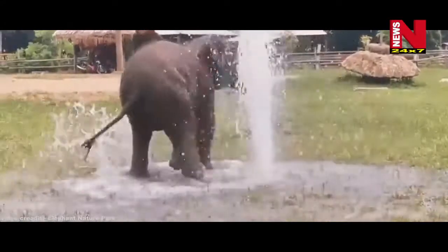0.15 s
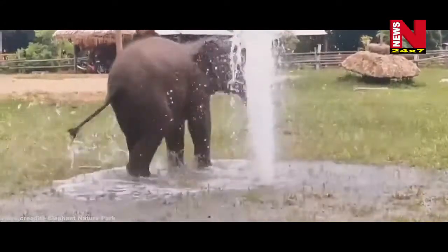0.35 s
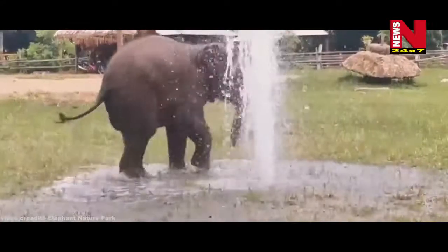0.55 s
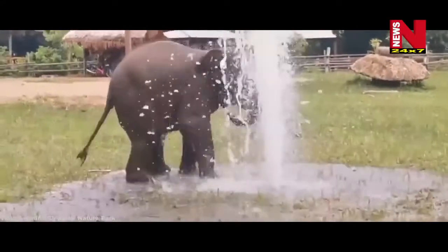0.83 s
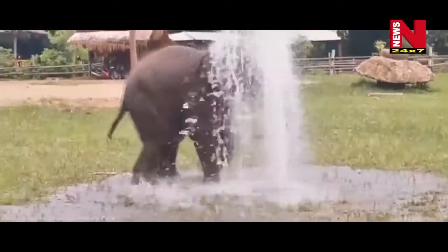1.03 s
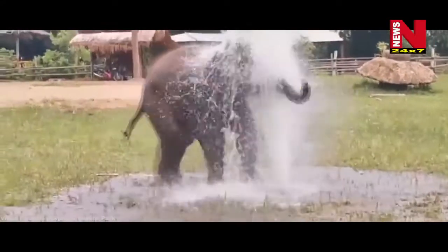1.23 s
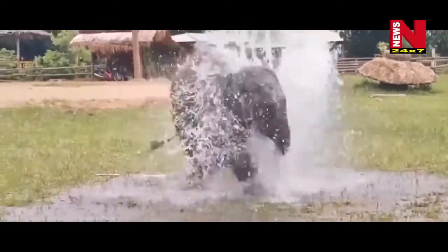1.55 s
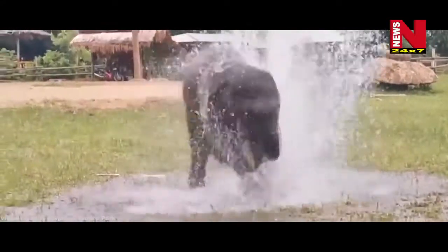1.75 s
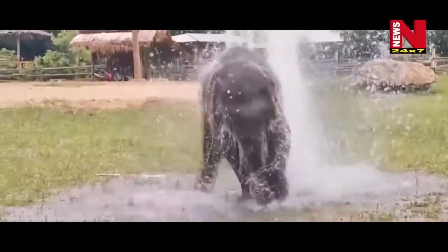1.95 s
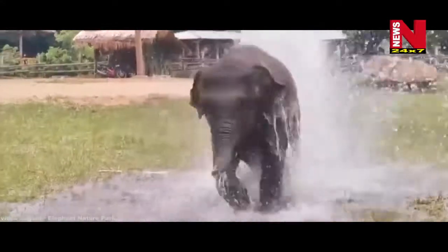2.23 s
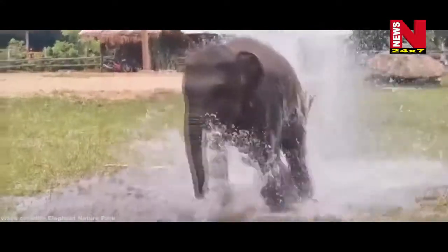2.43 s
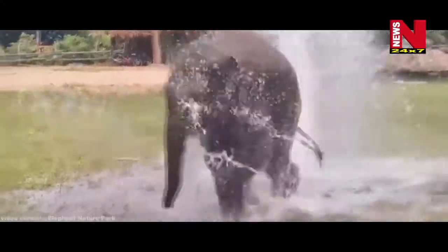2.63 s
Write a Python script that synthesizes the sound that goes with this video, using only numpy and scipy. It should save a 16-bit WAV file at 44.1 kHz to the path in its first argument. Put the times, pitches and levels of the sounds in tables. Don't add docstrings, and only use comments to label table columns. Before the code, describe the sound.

Bright gushing spray from a broken pipe runs throughout, dipping near one second and surging after one and a half. Wet slaps and low gulping wading sounds follow, over faint hum, in coloured, slightly phasey mono.

```python
import sys
import numpy as np
from scipy import signal
from scipy.io import wavfile
from scipy.ndimage import uniform_filter1d

SR = 44100
rng = np.random.default_rng(int(sys.argv[2]) if len(sys.argv) > 2 else 0)


def waveform_to_disk(signal):
    frames = np.transpose(np.atleast_2d(signal))
    scaled = np.clip(frames, -1, 1) * 32767
    samples = np.round(scaled).astype(np.int16)
    wavfile.write(sys.argv[1], SR, samples)


def nominal_scale(level):
    x = np.asarray(level, float) / 20
    return 10 ** x


N = 123479

# time in seconds, level in dB, brightness in dB per octave.
SPRAY_CURVE = [(0, -32, 0), (.12, -34.5, -1.2), (.3, -33, 1.6), (.55, -35.5, -0.5), (.62, -34.5, 0.5),
               (.73, -33.5, 0.6), (.78, -37.5, -0.1), (1.0, -39, -0.54), (1.25, -37.5, -0.1),
               (1.42, -36, -0.3), (1.56, -30.5, 0), (1.66, -34, 1.5), (1.78, -29.5, 2), (1.95, -32.5, 0.2),
               (2.15, -31, 1.4), (2.3, -32.5, 1.5), (2.5, -34.5, -0.5), (2.8, -34, 2)]
# frequency in Hz, level in dB.
SPRAY_COLOUR = [(300, -20.5), (800, -6.5), (1500, -5), (2500, 4.5), (5000, 3), (7500, 3.5), (10000, 0),
                (14000, -8.5)]
# time in seconds, level in dB, tilt in dB per octave.
SPLATTER_CURVE = [(0, -40, -2.5), (.12, -38.5, -2), (.35, -37, -1.5), (.55, -53.5, 0.5), (.8, -48.5, -1.5),
                  (1.1, -55.5, -2), (1.38, -51, 1), (1.45, -36.5, -3.5), (1.6, -38.5, 0), (1.72, -35.5, 1),
                  (1.8, -35, 3.5), (1.9, -35, 0.5), (2.02, -28.5, -4), (2.12, -36, 0), (2.24, -38, 1.5),
                  (2.45, -32.5, -5), (2.65, -50, 0.5), (2.8, -35.5, -4)]
# time in seconds, level in dB.
SLOSH_CURVE = [(0.0, -36.5), (0.03, -47.5), (0.3, -45.5), (0.61, -55), (1.28, -59.5), (1.73, -46.5),
               (1.82, -40), (1.91, -41), (2.07, -39.5), (2.15, -50), (2.34, -40), (2.36, -46), (2.52, -38),
               (2.53, -39.5), (2.66, -42.5), (2.8, -40)]
# frequency in Hz, width in Hz, level in dB.
HUM_LINES = [
    (45, 20, -59),
    (90, 11, -56.5),
    (212, 8, -60),
]
# frequency in Hz, width in Hz, gain in dB.
HOUSING = [(483, 178, -6), (839, 314, 7), (1210, 105.5, -9), (1554, 325, 9.5), (1735, 64, -11),
           (2730, 108, -15), (3383, 122, -17), (3920, 240, -4.5), (6090, 220, 0.5), (6450, 230, -5),
           (7670, 870, -8), (9050, 1000, 1), (10310, 490, -1)]
# frequency in Hz, step size in dB.
GRAIN_STEP = [(0, -18), (600, -14), (1300, -3), (2600, 3.5), (8000, 3.5), (14000, 4.5)]

SPRAY_TRIM_DB, SPRAY_SURGE_DB, SPRAY_PATCH_DB, SPRAY_SURGE_HZ = 2, 0.5, 0.96, 15.5
DROPS_PER_S, DROP_SPREAD_DB, DROP_SHARE = 9000, 4, 0.32
GOUTS_PER_S, GOUT_SPREAD_DB, GOUT_CYCLES, GOUT_CLUMP_DB, GOUT_CLUMP_HZ = 1400, 3.8, 8.0, 3.0, 30
GOUT_LOW_HZ, GOUT_HIGH_HZ, GOUT_TRIM_DB, GOUT_WASH = 640, 2430, -1.5, 0.64
SLOSH_PER_S, SLOSH_CYCLES, SLOSH_LOW_HZ, SLOSH_HIGH_HZ = 400, 1.97, 184, 454
SLOSH_TRIM_DB, SLOSH_CLUMP_DB = 2, 3.0
RUMBLE_DB, RUMBLE_LOW_HZ, RUMBLE_HIGH_HZ = -54, 16, 128.7
FAN_START_S, FAN_SWELL_S, FAN_STOP_S, FAN_FALL_S = 0.57, 0.07, 0.74, 0.027
FAN_DB, FAN_LOW_HZ, FAN_HIGH_HZ = -38, 4430, 6870
SWAY_HZ, SWAY_SHIFT, SWAY_DEPTH = 9.0, 1.3, 0.3
TOP_HZ, TOP_DIP_HZ, TOP_DIP_RATE_HZ = 13960, 330, 14
GRAIN_JITTER_DB, MASK_HZ, ROUND_UP = 2.3, 1600, 0.4


def rms_one(x):
    return x / np.sqrt(np.mean(x ** 2) + 1e-20)


def level(rows, column=1):
    columns = np.transpose(rows)
    return np.interp(np.arange(N) / SR, columns[0], columns[column])


def drift(rate_hz):
    r = np.exp(-40 * np.pi * rate_hz / SR)
    noise = rng.standard_normal(N // 20 + 2002)
    slow = signal.lfilter([1], [1, -2 * r, r * r], noise)[2000:]
    return np.interp(np.arange(N) / 20, np.arange(len(slow)), rms_one(slow))


def band(x, low_hz, high_hz):
    return signal.sosfilt(signal.butter(2, [low_hz, high_hz], "band", fs=SR, output="sos"), x)


def ring(x, hz, width_hz):
    r = np.exp(-np.pi * width_hz / SR)
    poles = [1, -2 * r * np.cos(2 * np.pi * hz / SR), r * r]
    return signal.lfilter([(1 - r * r) / 2, 0, (r * r - 1) / 2], poles, x)


def impacts(per_s, spread_db, clump_db):
    sizes = nominal_scale(spread_db * np.minimum(rng.exponential(1, N), 5))
    sizes = sizes * rng.choice([-1, 1], N)
    return sizes * (rng.random(N) < per_s * nominal_scale(clump_db) / SR) + 1e-18


def plops(clicks, low_hz, high_hz, cycles, tilt_db, wash):
    pitch_index = rng.integers(0, 16, N)
    hits = rms_one(clicks)
    out = 0
    for k, hz in enumerate(np.geomspace(low_hz, high_hz, num=16)):
        drive = hits * (pitch_index == k) + wash / 4 * rng.standard_normal(N)
        gain = nominal_scale(tilt_db * np.log2(hz / low_hz)) / np.sqrt(hz)
        out = out + gain * ring(drive, hz, 1.72 * hz / cycles)
    return rms_one(out)


def spray():
    surge_db = SPRAY_SURGE_DB * drift(SPRAY_SURGE_HZ)
    drops = rms_one(impacts(DROPS_PER_S, DROP_SPREAD_DB, 0))
    hiss = rng.standard_normal((2, N))
    beds = np.sqrt(1 - DROP_SHARE) * hiss + np.sqrt(DROP_SHARE) * drops
    colour_hz, colour = np.transpose(SPRAY_COLOUR)
    brightness = level(SPRAY_CURVE, column=2)
    edges = 250 * 2 ** (np.arange(19) / 3)
    out = 0
    for k, (low, high) in enumerate(zip(edges, edges[1:])):
        band_db = np.interp(np.log(low * high) / 2, np.log(colour_hz), colour)
        band_db = band_db + brightness * np.log2(low / 6000)
        patch_db = SPRAY_PATCH_DB * drift(17)
        out = out + nominal_scale(band_db + surge_db + patch_db) * band(beds[k % 2], low, high)
    return nominal_scale(level(SPRAY_CURVE) + SPRAY_TRIM_DB) * rms_one(out)


def splatter():
    clump_db = GOUT_CLUMP_DB * drift(GOUT_CLUMP_HZ)
    hits = impacts(GOUTS_PER_S, GOUT_SPREAD_DB, clump_db)
    tilt_db = level(SPLATTER_CURVE, column=2)
    slaps = plops(hits, GOUT_LOW_HZ, GOUT_HIGH_HZ, GOUT_CYCLES, tilt_db, GOUT_WASH)
    return nominal_scale(level(SPLATTER_CURVE) + GOUT_TRIM_DB) * band(slaps, 0.8 * GOUT_LOW_HZ, 6000)


def slosh():
    hits = impacts(SLOSH_PER_S, 3.1, SLOSH_CLUMP_DB * drift(5))
    gulps = plops(hits, SLOSH_LOW_HZ, SLOSH_HIGH_HZ, SLOSH_CYCLES, tilt_db=-0.1, wash=0.98)
    return nominal_scale(level(SLOSH_CURVE) + SLOSH_TRIM_DB) * gulps


def pump():
    noise = rng.standard_normal((len(HUM_LINES) + 1, N + SR))
    rumble = band(noise[-1], RUMBLE_LOW_HZ, RUMBLE_HIGH_HZ)[SR:]
    out = nominal_scale(RUMBLE_DB) * rms_one(rumble)
    for source, (hz, width_hz, db) in zip(noise, HUM_LINES):
        hum = ring(ring(source, hz, width_hz), hz, width_hz)[SR:]
        out = out + nominal_scale(db) * rms_one(hum)
    return out


def fan():
    times = [FAN_START_S, FAN_START_S + FAN_SWELL_S, FAN_STOP_S, FAN_STOP_S + FAN_FALL_S]
    shape = np.interp(np.arange(N) / SR, times, [0, 1, 1, 0])
    drops = impacts(DROPS_PER_S * 2, DROP_SPREAD_DB, 0)
    return nominal_scale(FAN_DB) * shape * rms_one(band(drops, FAN_LOW_HZ, FAN_HIGH_HZ))


def scene():
    return (spray() + splatter() + slosh() + pump() + fan())[None]


def housing(x):
    hz, s, z = signal.stft(x, SR, nperseg=2048, noverlap=1536)
    at = np.minimum((s * SR).astype(int), N - 1)
    hz = hz[:, None]
    for centre_hz, width_hz, db in HOUSING:
        centre = centre_hz + SWAY_SHIFT * np.sqrt(centre_hz) * drift(SWAY_HZ)[at]
        depth_db = db * np.exp(SWAY_DEPTH * (db < 0) * drift(SWAY_HZ)[at])
        z = z * nominal_scale(depth_db / (1 + (2 * (hz - centre) / width_hz) ** 2))
    return signal.istft(z, SR, nperseg=2048, noverlap=1536)[1][:N]


def thin_partials(x):
    m = 1024
    n, k = np.arange(2 * m), np.arange(m)
    hz = k * SR / (2 * m)
    window = np.sin(np.pi * (n + 0.5) / (2 * m))[:, None]
    basis = window * np.cos(np.pi / m * np.outer(n + 0.5 + m / 2, k + 0.5)) * np.sqrt(2 / m)
    padded = np.pad(x, (m, 2 * m - N % m))
    starts = np.arange(0, len(padded) - 2 * m + 1, m)
    lines = padded[starts[:, None] + n] @ basis

    nearby = uniform_filter1d(lines ** 2, size=int(MASK_HZ * 2 * m / SR), axis=1)
    nearby = uniform_filter1d(nearby, size=3, axis=0)
    jitter = rng.standard_normal((len(starts), m // 8))
    jitter_db = GRAIN_JITTER_DB * np.repeat(jitter, 8, axis=1)
    step = nominal_scale(np.interp(hz, *np.transpose(GRAIN_STEP)) + jitter_db) * np.sqrt(nearby + 1e-14)
    lines = np.sign(lines) * np.floor(abs(lines) / step + ROUND_UP) * step

    dips = np.maximum(drift(TOP_DIP_RATE_HZ)[np.minimum(starts, N - 1)], 0)
    top_hz = TOP_HZ - TOP_DIP_HZ * dips
    lines = lines * (hz < top_hz[:, None])
    out = np.zeros(len(padded))
    np.add.at(out, starts[:, None] + n, lines @ basis.T)
    return out[m:m + N]


def roll_off(x):
    return signal.sosfilt(signal.butter(12, 14580, fs=SR, output="sos"), x)


def record(dry):
    mix = thin_partials(housing(dry[0]))[None]
    return roll_off(mix)


dry = scene()
out = record(dry)
waveform_to_disk(out)
```